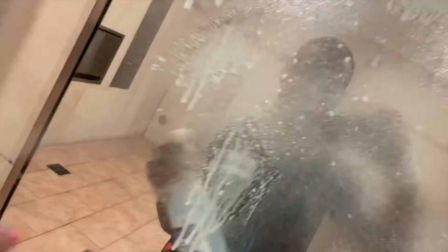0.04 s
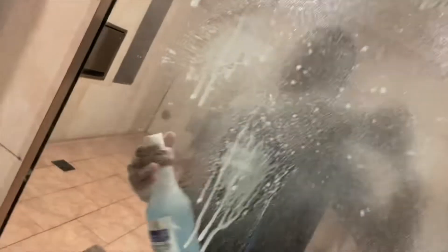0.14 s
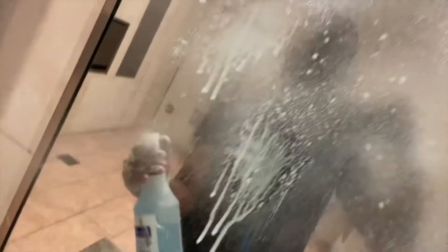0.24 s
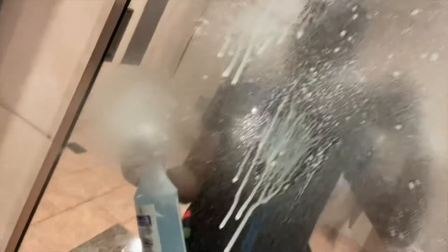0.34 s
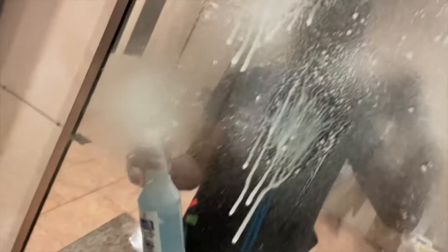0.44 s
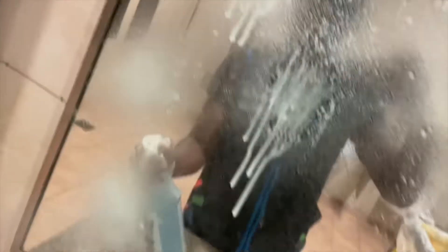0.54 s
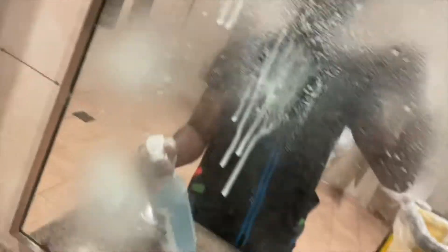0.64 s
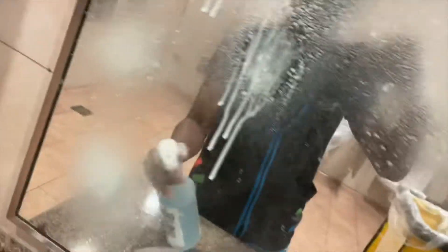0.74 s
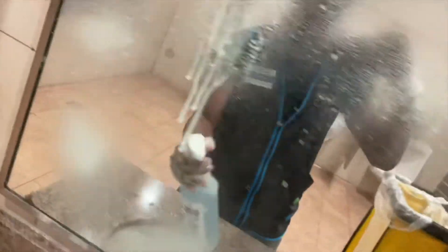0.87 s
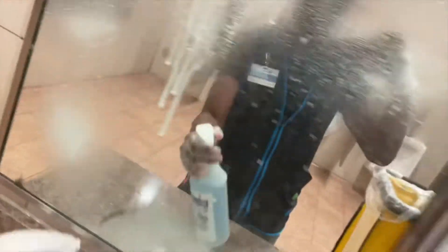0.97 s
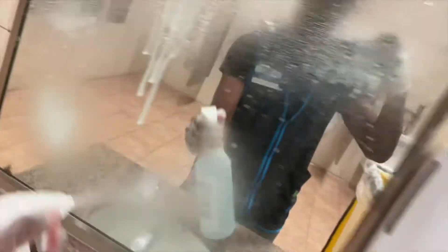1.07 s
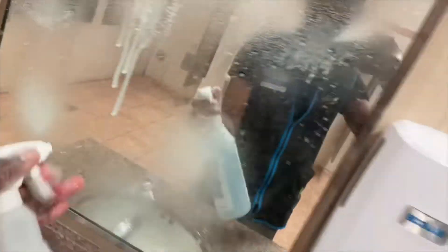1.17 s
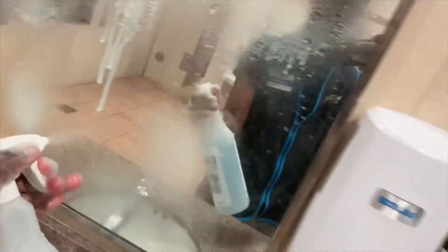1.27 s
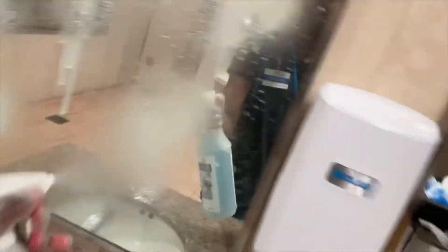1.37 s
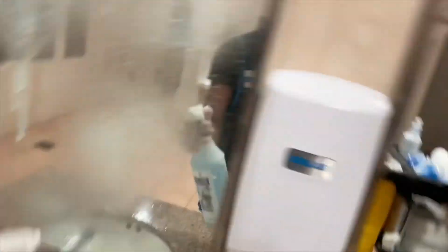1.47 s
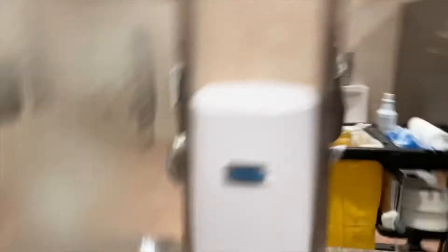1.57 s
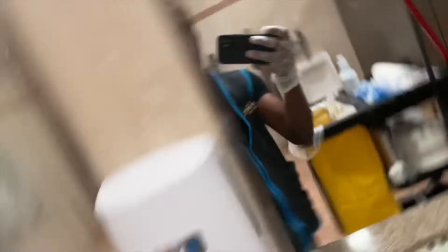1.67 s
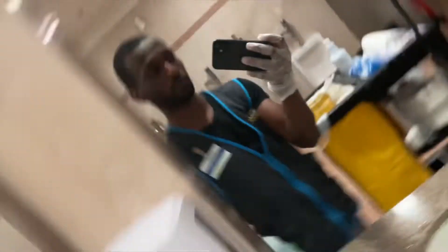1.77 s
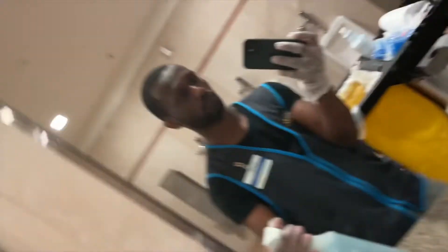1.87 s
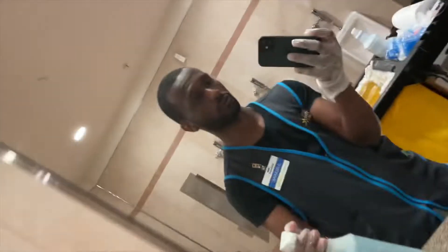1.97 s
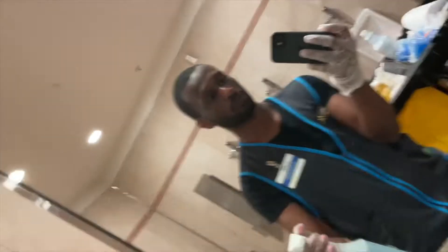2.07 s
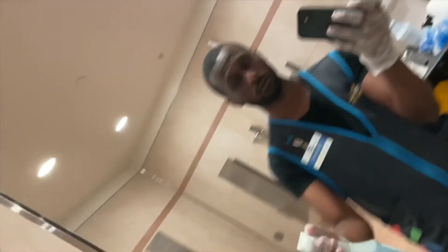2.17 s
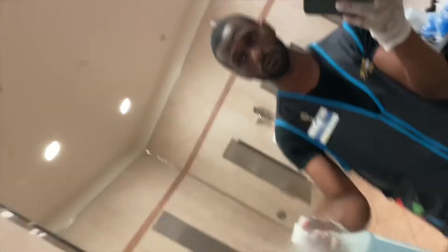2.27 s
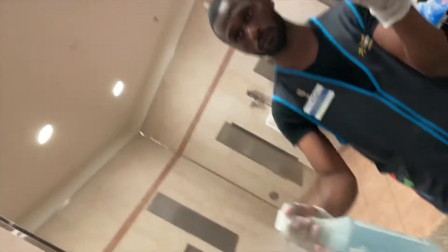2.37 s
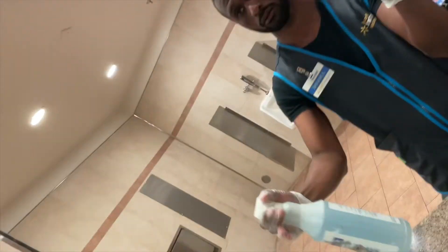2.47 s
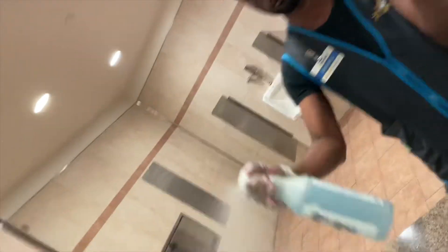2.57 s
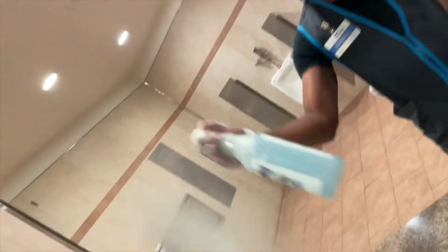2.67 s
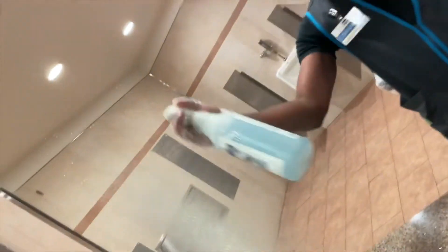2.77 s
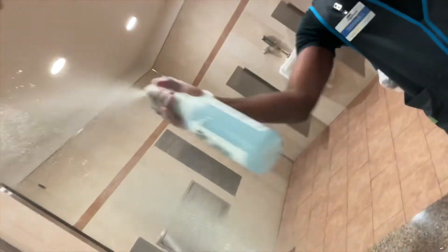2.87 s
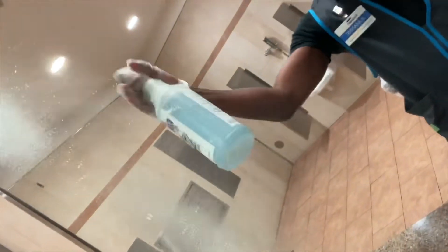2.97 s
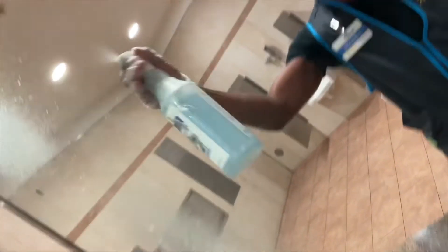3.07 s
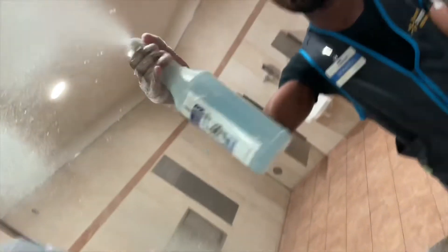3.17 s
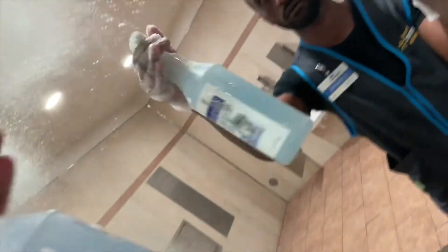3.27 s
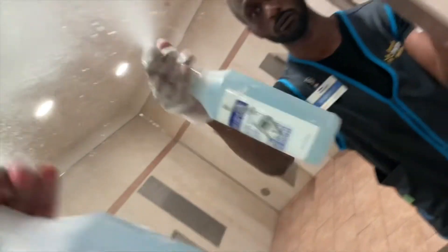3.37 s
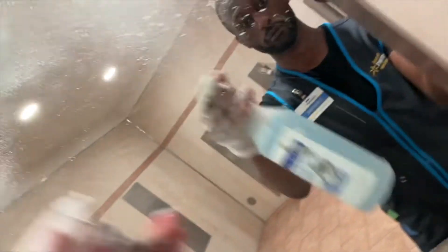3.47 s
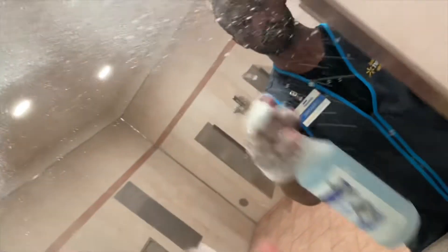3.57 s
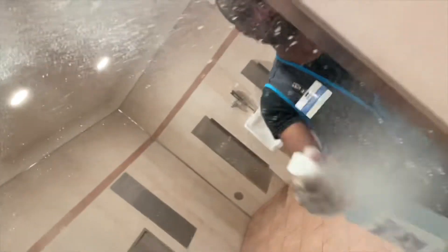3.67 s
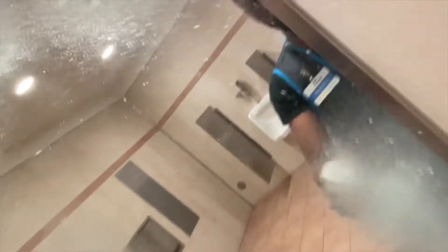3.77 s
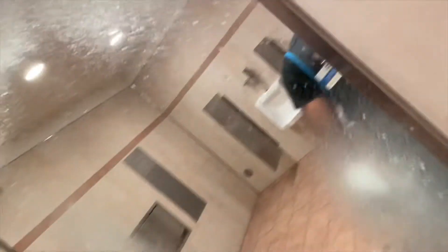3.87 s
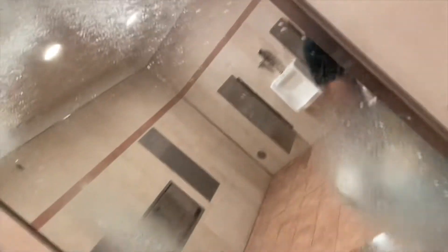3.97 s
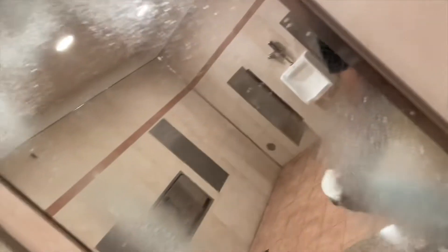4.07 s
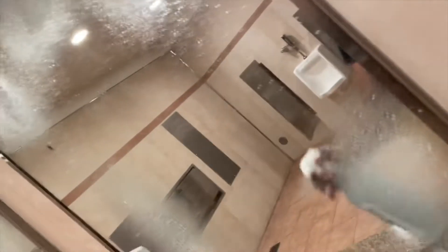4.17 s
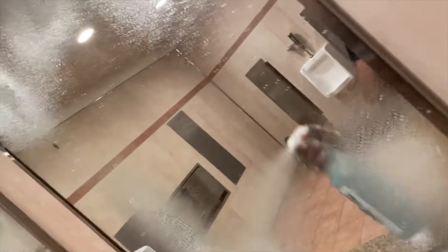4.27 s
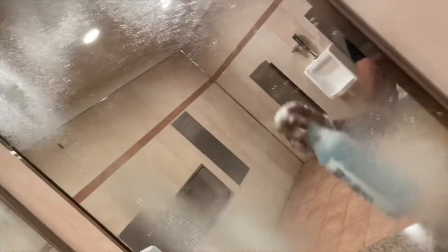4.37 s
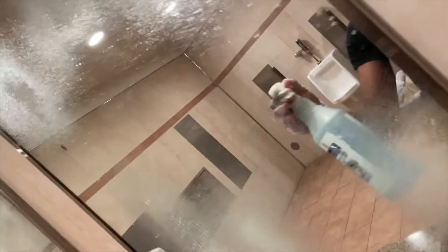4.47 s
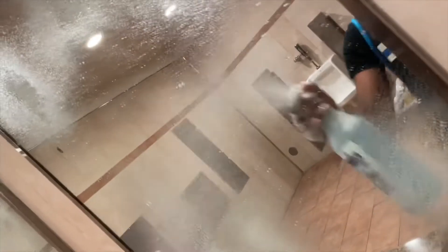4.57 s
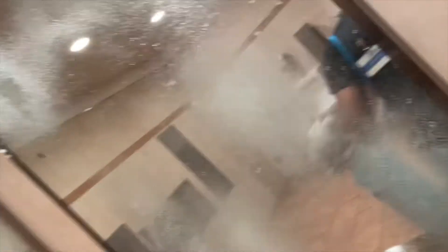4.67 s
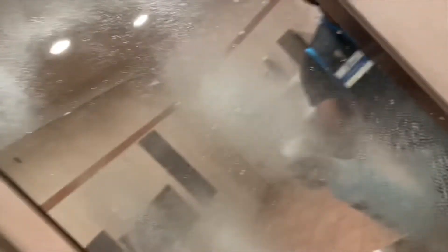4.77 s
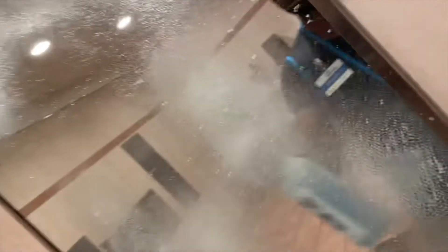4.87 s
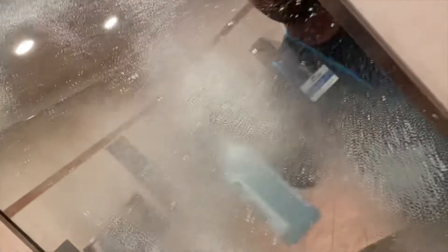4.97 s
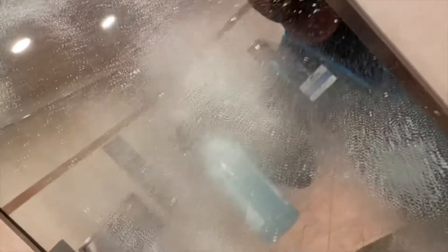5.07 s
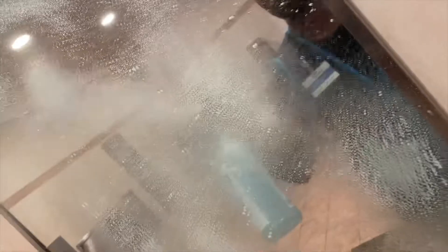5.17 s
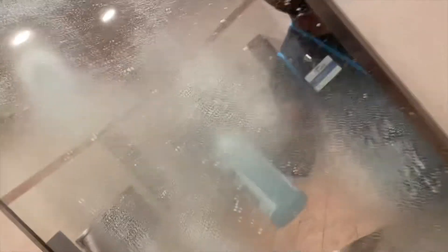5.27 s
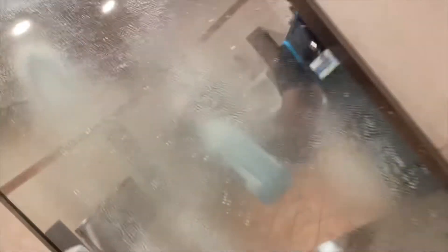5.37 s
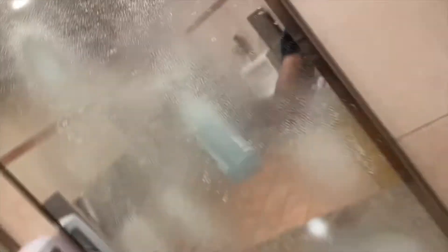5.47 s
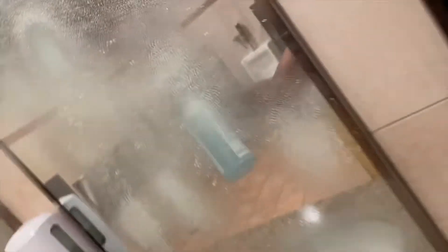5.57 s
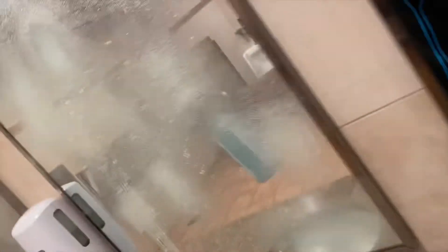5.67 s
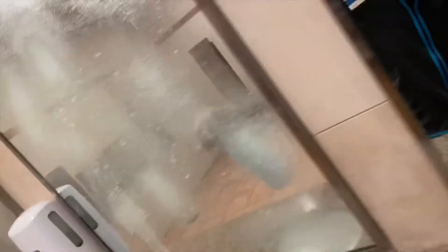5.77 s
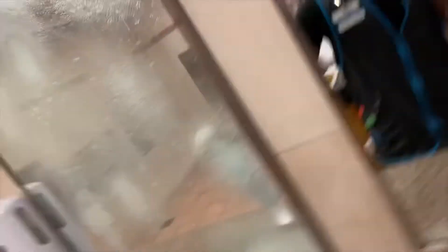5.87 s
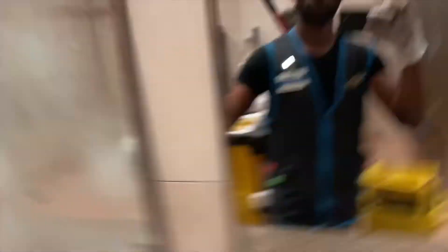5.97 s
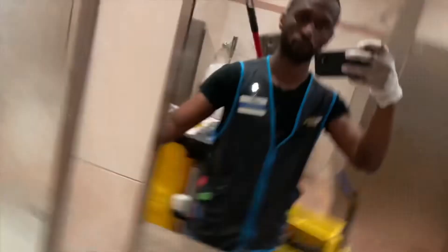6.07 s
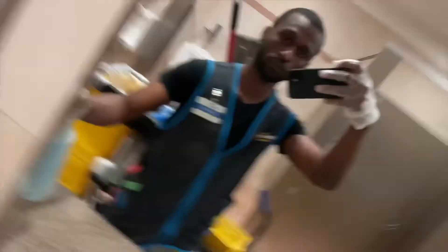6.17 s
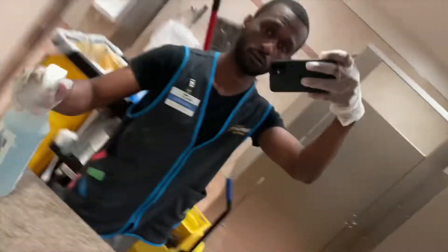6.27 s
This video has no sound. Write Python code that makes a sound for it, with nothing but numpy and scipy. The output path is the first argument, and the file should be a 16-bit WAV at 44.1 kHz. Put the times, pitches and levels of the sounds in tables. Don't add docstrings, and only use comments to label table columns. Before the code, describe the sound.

In a tiled restroom, heard close on a phone, a trigger bottle sprays a mirror. The tail of a stronger squirt opens the sound, with low, dull hand thumps on the phone at 0.1 to 0.2 s. Short hisses follow at about 0.16, 0.43, 0.7, 0.95 and 1.25 s, each bright and sharp-edged, with wet spatter and a faint hollow pump tone. From 1.4 to 2.1 s spraying stops; low vent rumble, airy wash, a soft sleeve rustle and a thin breathy pipe whistle remain. Squirts resume at 2.15 s, roughly every 0.3 s, with tiny creaks and fading mist fizz between them. A cluster of plastic ticks snaps around 4.7 s. The last pulls, at 5.4, 5.8 and 6.2 s, are slower and slightly longer, with cloth rustling and a faint wavering pipe moan near 6.1 s. Hard walls lightly echo the squirts throughout.

```python
import sys
import numpy as np
from scipy import signal
from scipy.io import wavfile
from scipy.ndimage import uniform_filter1d, minimum_filter1d

SR = 44100
rng = np.random.default_rng(int(sys.argv[2]) if len(sys.argv) > 2 else 0)


def field_ratio(decibels):
    return 10 ** (np.asarray(decibels, dtype=float) / 20)


def materialize(psi):
    bounded = np.clip(np.atleast_2d(psi).T, -1, 1)
    quanta = np.round(bounded * 32767).astype(np.int16)
    wavfile.write(sys.argv[1], SR, quanta)


N = 279153
STEP = 8

# f/Hz, level/dB
JET_COLOUR = [(2500, -20.5), (5000, -19), (7500, -1), (10000, -0.5), (12400, 0), (14000, 1), (15500, 0.5),
              (17000, -7.5)]
# f/Hz, level/dB
SPLASH_COLOUR = [(1200, -23), (2000, -11.5), (3200, -9.5), (3900, -0.5), (4500, -4), (6000, -0.5),
                 (7500, -1), (10000, -47)]
# t/s, f/Hz
HOLLOW_NOTE = [(0, 1030), (.75, 1096), (1.1, 1000), (2.25, 1045), (3.05, 1156), (3.9, 1152), (4.55, 1026),
               (5.5, 1080), (6.33, 1050)]
# t/s, splash level/dB
NOZZLE_AIM = [(0, 0.5), (.5, 0), (1.05, 1.5), (2.25, 0.5), (2.55, 0), (2.85, 1), (3.1, -0.5), (3.38, 4),
              (3.95, 0), (4.25, 1), (4.55, 2.5), (4.85, 0), (5.5, 0.5), (6.25, 0)]
# start t/s, length t/s, early jet level/dB, late jet level/dB, hollow level/dB
PULLS = [(-.1, 0.15, -29, -37, -46.5), (0.163, 0.13, -34, -38.5, -49), (0.427, .14, -35.5, -36.5, -50.5),
         (.71, 0.13, -35, -38.5, -51.5), (.962, 0.13, -37, -39, -52), (1.233, 0.14, -37.5, -39, -54),
         (2.149, 0.16, -37, -37, -48), (2.47, 0.13, -40, -37.5, -48.5), (2.754, 0.14, -39.5, -38.5, -52.5),
         (3.028, .13, -37, -37.5, -50), (3.289, .12, -38, -36, -50), (3.571, 0.14, -34.5, -36, -49),
         (3.869, 0.14, -37.5, -36, -49.5), (4.149, 0.15, -37, -38, -49.5),
         (4.46, 0.15, -38.5, -36.5, -49.5), (4.771, 0.13, -39, -36.5, -46.5),
         (5.066, 0.16, -38, -39, -48.5), (5.412, 0.19, -40.5, -39, -53.5), (5.792, 0.18, -39.5, -41, -52.5),
         (6.2, 0.16, -42, -32.5, -55)]


def spray():
    flow, wetting, swell = fine(sum(stroke(*pull) for pull in PULLS))
    breakup = evened(uniform_filter1d(rng.standard_normal(N), size=30))
    droplets = field_ratio(0.62 * breakup)
    jet = field_ratio(6.5) * evened(hiss(JET_COLOUR, patchy_db=1.5, flicker_db=1.9) * droplets)
    splash_gain = field_ratio(follow(NOZZLE_AIM, column=1) + 3.5)
    splash = splash_gain * hiss(SPLASH_COLOUR, patchy_db=2.5, flicker_db=0.5)
    hz = follow(HOLLOW_NOTE, column=1)
    once = resonate(rng.standard_normal((2, N)), hz, 370)
    hollow = field_ratio(0.5) * evened(resonate(once, hz, 340))
    return flow * jet + wetting * splash + swell * hollow


ATTACK_S, BURST_DB, BURST_S = 0.0097, 4.5, 0.019
RELEASE_DB, RELEASE_S, RELEASE_BEND = -19, 0.04, 1.35
SPLASH_DB, SPLASH_LAG_S, SPLASH_STOP_S = -10, 0.011, 0.032
SPIT_DB, SPIT_S = 1, 0.0047
HOLLOW_RISE_S, HOLLOW_LEAD_S, HOLLOW_FALL_S = 0.038, 0.0025, 0.025


def stroke(start, length, early_db, late_db, hollow_db):
    t = clock() - start
    opening = np.clip(t / ATTACK_S, 0, 1) ** 2
    held_db = early_db + (late_db - early_db) * np.clip(t / length, 0, 1)
    held_db = held_db + BURST_DB * np.exp(-abs(t) / BURST_S)
    fade_db = RELEASE_DB * (np.clip(t - length, 0, 1) / RELEASE_S) ** RELEASE_BEND
    spit_db = SPIT_DB * np.exp(-abs(t) / SPIT_S)
    stop_db = RELEASE_DB * (np.clip(t - length - SPLASH_LAG_S, 0, 1) / SPLASH_STOP_S) ** 2
    wet_db = held_db + SPLASH_DB + spit_db + stop_db
    rise = np.clip(t / HOLLOW_RISE_S, 0, 1)
    fall = np.clip((length - HOLLOW_LEAD_S - t) / HOLLOW_FALL_S + 1, 0, 1)
    return np.array([opening * field_ratio(held_db + fade_db), opening * field_ratio(wet_db), rise * fall * field_ratio(hollow_db)])


# t/s, peak level/dB, ring f/Hz, 60 dB decay t/s
TICKS = [(2.1233, -41, 1060, 0.025), (4.4504, -33, 1105, 0.019), (4.649, -36, 1950, 0.02),
         (4.6674, -63, 2100, 0.025), (4.6904, -36.5, 2050, 0.025), (4.6954, -31, 1425, 0.021),
         (4.7028, -39, 2580, 0.01), (4.708, -29.5, 1920, 0.011), (4.7154, -49, 2610, 0.025),
         (4.6985, -42, 2150, 0.019), (4.7055, -43, 2350, 0.02), (4.7088, -37, 2770, 0.014),
         (4.761, -44, 1100, 0.024), (5.0494, -39, 1070, 0.026), (5.4015, -52, 3430, 0.025),
         (2.9871, -37, 2350, 0.012), (3.2744, -41, 2320, 0.017), (3.5259, -36.5, 2230, 0.011),
          (3.5633, -42, 3890, 0.013), (3.8222, -40.5, 2350, 0.015), (4.7077, -37, 1900, 0.0066),
          (5.3911, -46, 3380, 0.012), (5.674, -44, 2360, 0.013)]


def trigger_ticks():
    return knocks(TICKS, rise=0.00027, rough=0.31)


# t/s, peak level/dB, f/Hz, 60 dB decay t/s
BUMPS = [
    (.082, -26.5, 240, 0.1),
    (.083, -31, 450, 0.027),
    (.09, -16, 84, 0.1),
    (.112, -25, 174, 0.037),
    (.182, -22, 78, 0.16),
    (.235, -34, 76, 0.14),
]


def hand_bumps():
    return knocks(BUMPS, rise=0.00114, rough=0)


def knocks(rows, rise, rough):
    out, t = np.zeros(N), np.arange(SR // 4) / SR
    band = signal.butter(2, [1300, 4600], "band", fs=SR)
    grits = evened(signal.lfilter(*band, rng.standard_normal((len(rows), len(t)))))
    for (s, db, hz, t60), grit in zip(rows, grits):
        ring = np.sin(2 * np.pi * hz * t) + rough * grit
        decay = field_ratio(db - 60 * t / t60)
        add(out, s, -decay * (1 - np.exp(-t / rise)) * ring)
    return out


# f/Hz, level/dB
FIZZ_COLOUR = [(4000, -30), (6000, -4), (8000, 0), (13000, -2), (14500, -6), (16000, -14)]
# f/Hz, level/dB
RUSTLE_COLOUR = [(1200, -25), (2200, 5.5), (3800, 0.5), (6000, 2), (8000, -14)]
# centre t/s, half width t/s, level/dB, fizz re rustle level/dB
RUSTLES = [
    (1.6, .12, -54.5, -23),
    (2.122, 0.026, -65, -3),
    (2.72, 0.1, -54, -32),
    (4.1, .06, -62, -19),
    (4.703, 0.013, -52, -13),
    (6.07, 0.21, -54, -11),
]


def seep():
    thin = aftermath(-8, 99, -82.5)
    dull = aftermath(-24, 37, -72)
    for s, width, db, bright_db in RUSTLES:
        hump = field_ratio(db) * bump_shape(s, width)
        thin = thin + hump * field_ratio(bright_db)
        dull = dull + hump
    fizz = fine(thin) * hiss(FIZZ_COLOUR, patchy_db=-1.0, flicker_db=0.3)
    rustle = fine(dull) * hiss(RUSTLE_COLOUR, patchy_db=2.0, flicker_db=1.5)
    return fizz * [[1], [.55]] + rustle


def aftermath(db, fade, floor_db):
    t = clock()
    trails = []
    for s, length, _, late_db, _ in PULLS:
        lost_db = fade * np.maximum(t - s - length, 0)
        trails.append((t > s) * field_ratio(late_db + db - lost_db))
    return np.max(trails, axis=0) + field_ratio(floor_db)


# f/Hz, 60 dB decay t/s
TILE_DECAY = [(300, 1.7), (1000, 1.85), (4000, 0.99), (8000, 0.72), (12000, 0.17), (16000, 0.2)]


def tiles(x):
    taps = np.zeros((2, SR))
    at = np.arange(300, SR - 20, 20) + rng.integers(0, 20, (2, (SR - 301) // 20))
    np.put_along_axis(taps, at, rng.choice([-1., 1.], at.shape), 1)
    hz, t, z = signal.stft(taps, SR, nperseg=256)
    decay = field_ratio(-60 * t / spectrum_at(TILE_DECAY, hz)[:, None])
    tail = signal.istft(z * decay, SR, nperseg=256)[1]
    return signal.fftconvolve(x, tail / np.linalg.norm(tail[0]), axes=1)[:, :N]


# t/s, level/dB
RUMBLE_LEVEL = [(0, -2.5), (.12, 9), (.39, -2), (.53, 0.5), (.69, -16), (.9, -5), (1.11, 0.5), (1.5, -1),
                (1.94, 2), (2.4, 0), (3.01, 2), (3.19, -2.5), (3.39, 0.5), (4.7, 1.5), (5.08, 1), (5.53, 0),
                (5.87, -3.5), (6.33, -1.5)]
# f/Hz, level/dB
RUMBLE_COLOUR = [(15, -59), (25, -40), (45, -4.5), (60, 8), (87, -6), (118, -0.5), (172, -6.5), (221, -18),
                 (251, -12.5), (400, -31), (520, -79), (880, -120)]
# f/Hz, level/dB
WASH_COLOUR = [(120, -19), (200, -5.5), (390, -3), (610, -5.5), (682, -11), (1030, -8), (1740, -11),
               (2290, -14.5), (3520, -13), (4400, -18.5), (9000, -45), (11700, -70), (19800, -120)]
# f/Hz, width f/Hz, level/dB
FAN_HUMS = [(55.7, 28, -54), (112.8, 17.6, -54.5), (246.7, 28, -73), (666, 9.7, -69.5)]
# centre t/s, half width t/s, level/dB
LULLS = [
    (.8, 0.3, -2.5),
    (1.65, 0.2, 2.5),
    (2., 0.11, -4),
    (2.55, 0.13, 2),
    (5.35, 0.059, -6.5),
    (6.1, 0.14, 5),
]


def vent():
    rumble_db = follow(RUMBLE_LEVEL, column=1)
    rumble = field_ratio(-45.5 + rumble_db) * hiss(RUMBLE_COLOUR, patchy_db=1.0, flicker_db=0.25, size=4096)
    lull_db = fine(sum(db * bump_shape(s, width) for s, width, db in LULLS))
    wash_db = -54.5 + 0.083 * rumble_db + lull_db
    wash = field_ratio(wash_db) * hiss(WASH_COLOUR, patchy_db=2.0, flicker_db=-1.04, size=1024)
    air = rng.standard_normal((2, N))
    hum = np.zeros((2, N))
    for hz, width, db in FAN_HUMS:
        peak = signal.iirpeak(hz, hz / width, SR)
        hum += field_ratio(db) * evened(signal.filtfilt(*peak, air))
    return rumble + wash + hum


# t/s, f/Hz, level/dB
MOAN = [(6.02, 552, -60), (6.064, 561, -44), (6.128, 577, -50), (6.2, 576, -50), (6.262, 548, -61.5),
        (6.3, 572, -69)]
# t/s, f/Hz, level/dB
WHISTLE = [(1.28, 1650, -67), (1.38, 1750, -60.5), (1.6, 1780, -56.5), (1.8, 1790, -61.5),
           (2.08, 1770, -61), (2.14, 1800, -87)]


def plumbing():
    return pipe(MOAN, 25, clear=0.76) + pipe(WHISTLE, 310, clear=0)


def pipe(rows, width, clear):
    hz, air = follow(rows, column=1), rng.standard_normal((2, N))
    tone = np.sqrt(2) * np.sin(2 * np.pi * np.cumsum(hz) / SR)
    breath = evened(resonate(resonate(air, hz, width), hz, width))
    level = field_ratio(follow(rows, column=2, outside=-150))
    return level * (clear * tone + (1 - clear) * breath)


def hiss(colour, patchy_db, flicker_db, size=512):
    frames, hz = 4 * N // size + 5, np.fft.rfftfreq(size, 1 / SR)
    a, b, c, d, patches = rng.standard_normal((frames, len(hz), 5)).T
    patches = uniform_filter1d(uniform_filter1d(patches, size=5, axis=0), size=12, axis=1)
    flicker = rng.standard_normal(frames)
    level_db = spectrum_at(colour, hz)[:, None] + patchy_db * evened(patches) + flicker_db * flicker
    z = np.array([a + 1j * b, c + 1j * d]) * field_ratio(level_db)
    return evened(signal.istft(z, nperseg=size, noverlap=3 * size // 4)[1][:, :N])


def resonate(x, hz, width):
    turn = np.exp(2j * np.pi * np.cumsum(hz * np.ones(N)) / SR)
    r = np.exp(-np.pi * width / SR)
    return 2 * (turn * signal.lfilter([1 - r], [1, -r], x / turn)).real


def evened(x):
    return x / np.sqrt(np.mean(x ** 2) + 1e-20)


def spectrum_at(points, hz):
    f, value = np.transpose(points)
    return np.interp(np.log(hz + 1), np.log(f + 1), value)


def follow(rows, column, outside=None):
    table = np.asarray(rows)
    return np.interp(np.arange(N) / SR, table[:, 0], table[:, column], outside, outside)


def add(mix, s, sound):
    part = mix[round(s * SR):][:len(sound)]
    part += sound[:len(part)]


def clock():
    return np.arange(0, N, STEP) / SR


def bump_shape(s, width):
    return np.exp(-((clock() - s) / width) ** 2)


def fine(envelope):
    return np.repeat(envelope, STEP, axis=-1)[..., :N]


def scene():
    near = (spray() + trigger_ticks()) * [[1], [.45]]
    far = seep() + vent() + plumbing()
    return near + field_ratio(-12.0) * tiles(near) + far + hand_bumps() * [[1], [.1]]


def low_pass(x):
    return signal.sosfilt(signal.butter(12, 16290, fs=SR, output="sos"), x)


# f/Hz, phase/rad
PORT_LEAD = [(300, 0), (1200, .9), (1800, .9), (2400, .1), (3700, 1.2), (4700, .1), (5600, -1.3),
             (6500, -2.45), (7550, -3.14), (8350, -3.85), (8800, -4.9), (9800, -5.8), (11800, -6.75),
             (12500, -7.9), (13600, -8.95), (15000, -9.7), (15500, -10.4)]
# f/Hz, share 0 to 1
PORT_LIKENESS = [(60, 0.97), (200, 0.91), (500, 0.31), (1500, 0.1), (3000, 0.18), (5000, 0.31),
                 (7000, 0.61), (16000, 0.24)]
# f/Hz, level/dB
BASS_LEAN = [(60, -0.5), (140, -4), (330, -0.5), (800, 0)]
# t/s, factor on the notch frequencies
HOLD = [(0, 0.98), (.5, 0.96), (.8, 1), (1.3, 0.99), (2.5, 0.98), (3.05, 0.97), (3.4, 0.962), (3.7, 0.99),
        (4.2, 0.99), (4.55, 0.97), (4.9, 0.99), (5.5, 0.97), (6.33, 1.003)]
# f/Hz, share 0 to 1
STRICT_SHARE = [(8000, .3), (10000, .3), (12500, .35), (14400, .55), (14600, 1)]


def record(dry):
    hz, t, (common, other) = signal.stft(dry, SR, nperseg=1024, noverlap=768)
    hz, (s, shift) = hz[:, None], np.transpose(HOLD)
    wobble = evened(uniform_filter1d(rng.standard_normal(len(t)), size=9))
    sway = np.interp(t, s, shift) + .008 * wobble
    angle = np.arccos(np.clip(spectrum_at(PORT_LIKENESS, hz), 0, 1)) / 2
    turn = np.exp(.5j * spectrum_at(PORT_LEAD, hz * sway)) * field_ratio(spectrum_at(BASS_LEAN, hz) / 2)
    left = (np.cos(angle) * common + np.sin(angle) * other) * turn
    right = (np.cos(angle) * common - np.sin(angle) * other) / turn

    power = uniform_filter1d(abs(left) ** 2 + abs(right) ** 2, size=3, axis=1) + 1e-20
    treble = (power * (hz > 1400)).mean(0)
    thinning = (power / uniform_filter1d(power, size=25, axis=0)) ** (0.3 * np.clip(hz / 2500, 0, 1))

    pair = np.array([left + right, left - right]) / 2
    strength = uniform_filter1d(uniform_filter1d(abs(pair) ** 2, size=21, axis=1), size=4, axis=2)
    strength = abs(strength) + 1e-20
    lull_db = 10 * np.log10(treble.max() / minimum_filter1d(treble, size=3, origin=1))
    quiet_db = np.clip(1.5 * (lull_db - 11), 0, 9)
    strict_db = quiet_db * spectrum_at(STRICT_SHARE, hz) + 2.5 * (abs(hz - 12050) < 3050)
    drop_db = -8.5 + 111 * (shift - 1)
    limit = field_ratio(2 * (np.interp(t, s, drop_db) + strict_db))
    pair /= 1 + (hz > 5500) * (limit * strength[::-1] / strength) ** 8

    luck = rng.standard_normal((2, len(hz) // 6 + 1, len(t) // 12 + 1))
    luck = np.kron(luck, np.ones((6, 12)))[:, :len(hz), :len(t)]
    mask_db = np.array([[[-46]], [[-42]]])
    masked = treble * field_ratio(mask_db + 9 * luck) / strength
    total, difference = pair / (1 + (abs(hz - 3500) < 2000) * masked ** 6)

    edge = 1 / (1 + (hz / 15720) ** 400) / (1 + (38 / (hz + 1)) ** 4)
    ports = np.array([total + difference, total - difference]) * thinning * edge
    mix = signal.istft(ports, nperseg=1024, noverlap=768)[1][:, :N]
    return low_pass(mix)


dry = scene()
out = record(dry)
materialize(out)
```